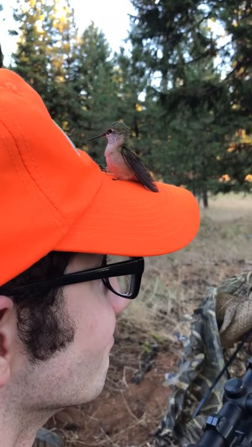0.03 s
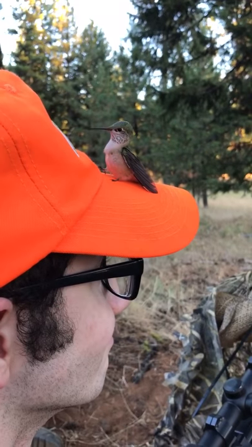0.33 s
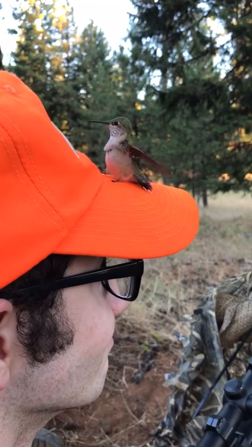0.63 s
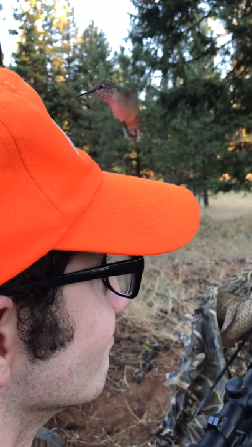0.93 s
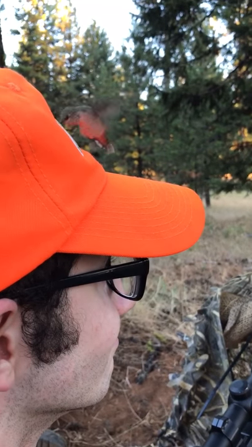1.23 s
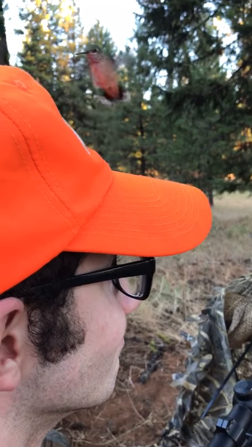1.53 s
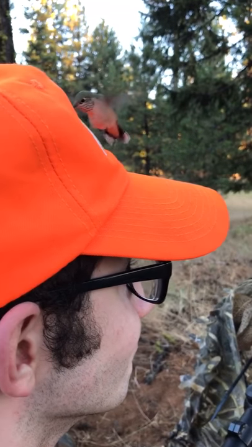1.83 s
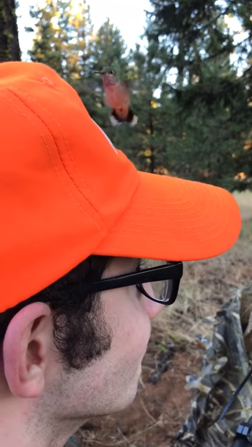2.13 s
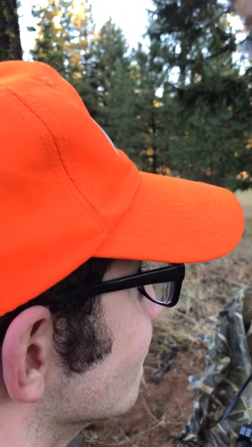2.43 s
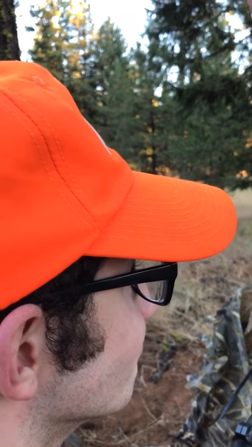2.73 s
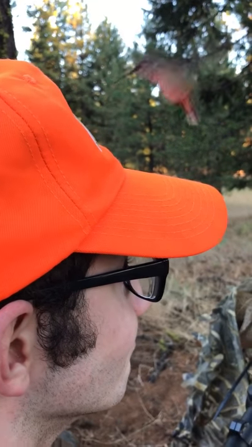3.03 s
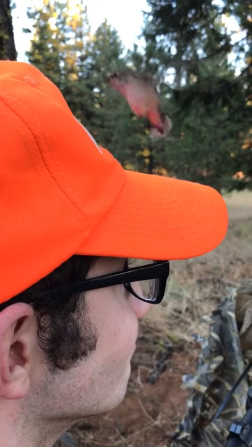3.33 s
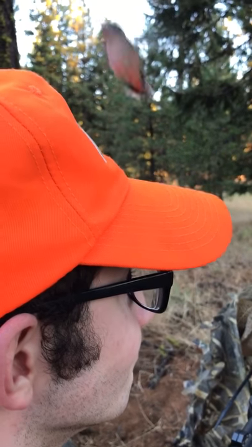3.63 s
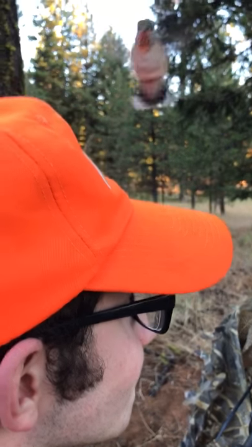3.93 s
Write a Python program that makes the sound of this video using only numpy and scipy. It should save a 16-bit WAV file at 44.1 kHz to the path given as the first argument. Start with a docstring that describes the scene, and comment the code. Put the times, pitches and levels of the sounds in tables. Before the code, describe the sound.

A hummingbird's wings hum softly as it takes off and hovers, over faint wind.

```python
"""Faint wind fills a still clearing, and a far insect starts to whistle on and off.
Just before one second, a hummingbird lifts off the brim of a cap. Each wingbeat pushes two soft
pulses of air and brushes the feathers twice. One small knock sounds just after take-off.
The bird then hovers around the cap: sharp turns add a swish, and the hum swells as it comes near,
most of all just after a tiny tick at 2.4 seconds."""
import sys
import numpy as np
from scipy import signal
from scipy.fft import rfft, irfft
from scipy.io import wavfile

SR = 44100
rng = np.random.default_rng(int(sys.argv[2]) if len(sys.argv) > 2 else 0)


def int16_out(signal):
    """Quantize to a 16-bit WAV file."""
    q = np.round(np.clip(np.atleast_2d(signal).T, -1, 1) * 32767)
    wavfile.write(sys.argv[1], SR, q.astype(np.int16))


N = 176400
TIME = np.arange(N) / SR

# How strong the wings' push on the air sounds: time_s, level_db
THRUST = [(.83,-73),(.89,-52.5),(.98,-62.5),(1.05,-72),(1.11,-57.5),(1.17,-61),(1.24,-64),(1.33,-62),(1.42,-66),(1.52,-53.5),(1.57,-72),(1.64,-54),(1.70,-66.5),(1.80,-56.5),(1.9,-58.5),(2.05,-57),(2.2,-64.5),(2.28,-62.5),(2.38,-72),(2.42,-59.5),(2.465,-42.5),(2.63,-49),(2.768,-43.5),(2.81,-53),(2.88,-56),(2.97,-53),(3.13,-55.5),(3.21,-64.5),(3.35,-55.5),(3.43,-51.5),(3.49,-65),(3.59,-67.5),(3.70,-52.5),(3.79,-66),(3.87,-51),(3.93,-64),(3.98,-50.5)]
STRONG_THRUST_DB = -41  # strokes grow even as the thrust nears this level
TAKEOFF_S = .8455
DOWNSTROKE_AT, UPSTROKE_AT = .429, .079  # places in one wingbeat, from 0 to 1


def wing_strokes(push_s=.00043, suck_s=.00165, suck_delay_s=.0035, jitter_s=.0003, scatter_db=1):
    """Each stroke gives a short push of air, then a longer suck. Light ones are duller and less even."""
    # The upstroke's strength against the downstroke's as the bird turns: time_s, level_db
    upstroke = [(.88,4),(1.13,-21.5),(1.36,-0.5),(1.65,-3.5),(2.02,-11),(2.3,1),(2.44,-27),(2.78,-20.5),(2.9,-17),(3.12,-19),(3.25,-3),(3.4,-15),(3.67,-7),(3.8,-20),(4,-1)]
    t = np.arange(-1024, 1025) / SR
    pulse = np.exp(-.5 * (t / push_s) ** 2) - .92 * np.exp(-.5 * ((t - suck_delay_s) / suck_s) ** 2)
    down, up = beat_times(DOWNSTROKE_AT), beat_times(UPSTROKE_AT)
    times = np.r_[down, up]
    down_share = 1 / np.hypot(1, amp(curve(upstroke, down)))
    up_share = 1 / np.hypot(1, amp(-curve(upstroke, up)))
    lightness = np.clip((STRONG_THRUST_DB - curve(THRUST)) / 15.5, .1, 1)
    late, loud = rng.standard_normal((len(times), 2)).T * np.interp(times, TIME, lightness)
    gains = np.r_[down_share, up_share] * amp(scatter_db * loud)
    air = pulse_train(times + jitter_s * late, gains, pulse)
    air = unit(signal.sosfilt(butter(2, hz=20, kind="high"), air))
    crisp = signal.sosfiltfilt(butter(4, hz=410), air)
    dull = signal.sosfiltfilt(butter(4, hz=320), air)
    return (crisp + .57 * lightness * (dull - crisp)) * amp(curve(THRUST) + 1)


def hum():
    """Lift rises and falls twice a beat, just ahead of the push. The body bobs once, an octave lower."""
    # How the smooth hum swells and fades: time_s, relative_db
    swell = [(.83,-71),(.88,-44),(.92,-50.5),(.99,-84),(1.15,-51.5),(1.39,-81),(1.5,-62),(1.8,-67),(1.88,-81),(2.02,-50),(2.22,-81),(2.28,-44),(2.335,-43),(2.38,-64),(2.48,-40),(2.65,-47),(2.77,-40.5),(2.9,-50.5),(3.0,-43),(3.14,-51),(3.2,-70),(3.35,-46),(3.55,-60),(3.75,-51),(4,-68)]
    beats = beat_count() - DOWNSTROKE_AT
    lift = np.cos(2 * np.pi * 2 * (beats + .033)) * amp(curve(swell) - 8.5)
    bob_db = -58 + .45 * (curve(THRUST) - STRONG_THRUST_DB)
    bob = np.cos(2 * np.pi * (beats - .71)) * amp(bob_db)
    return np.sqrt(2) * (lift + bob)


def dash_overtones():
    """In a quick dash both strokes bite alike, so tones at 4, 6 and 8 times the beat rate ring out."""
    # Quick dashes: middle_s, half_length_s, level_db
    dashes = [(0.889,0.017,-58.5),(1.32,0.032,-66),(1.485,0.028,-64),(2.261,0.013,-58),(2.304,0.032,-59.5),(3.683,0.032,-65)]
    # Strength of the three tones, lowest first: relative_db
    tone_levels = [3, -21.5, -17]
    phase = 2 * np.pi * (beat_count() - DOWNSTROKE_AT)
    tones = sum(amp(db) * np.cos(multiple * phase) for multiple, db in zip((4, 6, 8), tone_levels))
    return np.sqrt(2) * bursts(dashes) * tones


def wake():
    """Swirls of air left by the wings flutter once a beat and partly follow the thrust."""
    # The low rumble of the swirls: pitch_hz, relative_db
    spectrum = [(25,-11),(50,2.5),(110,1),(190,-1.5),(340,-9),(480,-16),(750,-28),(2500,-31.5),(6000,-41.5)]
    flutter = 1 + .71 * np.cos(2 * np.pi * (beat_count() - .45))
    level_db = -63 + .3 * (curve(THRUST) + 56)
    return noise(spectrum) * flutter * amp(level_db)


def feather_brushes(rise_s=.0019, fall_s=.0014, weaker_db=-4, scatter_db=3):
    """The feathers brush at both ends of the stroke: a short high tick, then a weaker one."""
    # How loud the brushing is: time_s, relative_db
    loudness = [(0.83, -90), (0.85, -69), (0.89, -70.5), (0.98, -72.5), (1.18, -72), (1.43, -75.5),
                (1.51, -72), (1.54, -80.5), (1.85, -75), (2.29, -76.5), (2.37, -83), (2.49, -75),
                (2.6, -75.5), (3.15, -70.5), (3.69, -70.5), (3.77, -77.5)]
    # The bright hiss of the feathers: pitch_hz, relative_db
    spectrum = [(1000,-26),(2500,-6.5),(4800,-8),(7400,-5),(8600,0.5),(9900,0),(10450,-5),(11100,1),(16800,1.5)]
    t = np.arange(-512, 513) / SR
    shape = np.where(t < 0, np.exp(-(t / rise_s) ** 2), np.exp(-abs(t) / fall_s))
    brushing = .15  # a little hiss stays between the ticks
    for times, db in (beat_times(0), 0), (beat_times(.4), weaker_db):
        gains = amp(db + scatter_db * rng.standard_normal(len(times)))
        brushing = brushing + pulse_train(times, gains, shape)
    return noise(spectrum) * unit(brushing) * amp(curve(loudness) + 1.5)


def swishes(hover_db=-79):
    """Air tears off the wings in mid-stroke, most of all in sharp moves."""
    # Sharp moves: middle_s, half_length_s, level_db
    moves = [(0.877,0.031,-72.5),(1.492,0.034,-68),(1.877,0.021,-73),(2.096,0.02,-75),(2.27,0.015,-69.5),(2.494,0.02,-69),(3.346,0.034,-69.5),(3.675,0.034,-69.5)]
    # The rush of torn air: pitch_hz, relative_db
    spectrum = [(200,-5),(500,8),(750,-3.5),(1150,1.5),(1700,-4.5),(3000,-14),(5000,-20),(7000,-17),(16000,-24.5)]
    twice_a_beat = unit(np.exp(.88 * np.cos(2 * np.pi * 2 * (beat_count() - .15))))
    return noise(spectrum) * (amp(hover_db) + bursts(moves)) * twice_a_beat


def feather_flicks(half_length_s=.0017):
    """Feather tips snap through the air as the bird brakes."""
    # Single snaps: middle_s, level_db
    snaps = [(1.317,-69.5),(1.48,-65),(1.5,-70),(2.462,-58.5),(2.484,-60),(2.507,-66),(2.531,-61),(2.741,-68),(2.764,-65.5),(3.335,-59.5),(3.354,-78),(3.651,-68),(3.675,-64)]
    # The sharp noise of a snap: pitch_hz, relative_db
    spectrum = [(700,2),(1450,6),(2100,-5),(3000,-1.5),(4800,-11.5),(6500,-1.5),(9000,-10),(16000,-22)]
    return noise(spectrum) * bursts((middle_s, half_length_s, db) for middle_s, db in snaps)


def knock(start_s=1.0005, echo_s=.0084, echo_db=-12.5):
    """A small hollow knock with a soft thud and one quick echo."""
    # The tones that ring in the knock: pitch_hz, level_db, ring_s
    tones = [(140,-44.5,0.032),(325,-37.5,0.013),(556,-33,0.02),(970,-42.5,0.0091),(2130,-43,0.011),(3340,-38.5,0.0025),(4030,-48.5,0.0065)]
    return sum(ring(start_s, *tone) + amp(echo_db) * ring(start_s + echo_s, *tone) for tone in tones)


def tick():
    """One tiny high tone that dies away at once."""
    return ring(start_s=2.408, pitch_hz=4120, level_db=-59.5, ring_s=.022)


def breeze(level_db=-67.5):
    """Faint, steady wind and hiss."""
    # The wind's rumble and hiss: pitch_hz, relative_db
    spectrum = [(15,-8),(42,1.5),(75,-0.5),(130,-9),(340,-9.5),(480,-16.5),(1000,-18),(1900,-24.5),(4000,-26),(4900,-28.5),(6500,-26.5),(7700,-30.5),(9500,-28.5),(10450,-32.5),(11500,-29.5),(13500,-28.5),(17000,-34)]
    return noise(spectrum) * amp(level_db)


def insect(pitch_hz=11130, level_db=-89.5, fade_s=.06):
    """A thin, broken whistle far off, probably an insect, comes and goes."""
    # When the insect calls: start_s, end_s
    calls = [(.33,0.73),(.69,1.3),(1.6,2.3),(2.5,3.2)]
    calling = sum(np.clip(np.minimum(TIME - start, end - TIME) / fade_s, 0, 1) for start, end in calls)
    waver = unit(signal.sosfilt(butter(2, hz=170), rng.standard_normal(N)))
    throb = unit(signal.sosfilt(butter(2, hz=12), rng.standard_normal(N)))
    whistle = np.sin(2 * np.pi * pitch_hz * TIME) * waver * (1 + .5 * throb)
    return unit(whistle) * calling * amp(level_db)


def beat_count():
    """How many wingbeats have passed since take-off, at every sample."""
    # How fast the wings beat: time_s, beats_per_s
    beat_rate = [(0.84, 49.06), (1.0, 42.29), (1.16, 45.82), (1.28, 44.35), (1.32, 49.06), (1.4, 40.59),
                 (1.48, 52.52), (1.56, 36.28), (1.76, 45.13), (1.8, 44.19), (1.88, 48.21), (1.92, 42.88),
                 (2.12, 45.89), (2.16, 38.25), (2.21, 38), (2.255, 54), (2.32, 45), (2.38, 35.6),
                 (2.48, 46.36), (2.52, 42.17), (2.76, 43.88), (2.8, 41.52), (3.44, 44.87), (3.48, 39.04),
                 (3.64, 46.48), (3.68, 50.49), (3.76, 37.05), (4.0, 44.08)]
    beats = np.cumsum(curve(beat_rate)) / SR
    return beats - np.interp(TAKEOFF_S, TIME, beats)


def beat_times(place):
    """The times at which the wings pass one place (0 to 1) in their beat."""
    beats = beat_count()
    return np.interp(np.arange(int(beats[-1]) + 1) + place, beats, TIME, right=TIME[-1] + 1)


def pulse_train(times, gains, shape):
    """Centres one copy of a shape on each time, even between two samples."""
    clicks = np.zeros(N + 1)
    inside = times < TIME[-1]
    sample, fraction = np.divmod(times[inside] * SR, 1)
    clicks[sample.astype(int)] += gains[inside] * (1 - fraction)
    clicks[sample.astype(int) + 1] += gains[inside] * fraction
    return signal.fftconvolve(clicks[:N], shape, "same")


def bursts(rows):
    """One smooth rise and fall for each row of middle_s, half_length_s, level_db."""
    return sum(amp(db) * np.exp(-((TIME - middle) / half) ** 2) for middle, half, db in rows)


def ring(start_s, pitch_hz, level_db, ring_s, rise_cycles=.7):
    """One tone of a struck object: it swells quickly and fades by 60 dB in ring_s."""
    t = np.maximum(TIME - start_s, 0)
    rise = 1 - np.exp(-t * pitch_hz / rise_cycles)
    fade = np.exp(-np.log(1000) * t / ring_s)
    return amp(level_db) * rise * fade * np.sin(2 * np.pi * pitch_hz * t)


def noise(spectrum):
    """Noise of strength 1, shaped by rows of pitch_hz, relative_db."""
    hz, db = np.transpose(spectrum)
    shape = amp(np.interp(np.log(np.fft.rfftfreq(N, 1 / SR) + 1), np.log(hz), db))
    return unit(irfft(rfft(rng.standard_normal(N)) * shape, N))


def butter(order, hz, kind="low"):
    """A filter that keeps what lies below ("low") or above ("high") a pitch."""
    return signal.butter(order, hz, kind, fs=SR, output="sos")


def curve(points, t=TIME):
    """Joins rows of time and value with straight lines."""
    return np.interp(t, *np.transpose(points))


def amp(db):
    """Turns decibels into a gain."""
    return 10 ** (np.asarray(db) / 20)


def unit(x):
    """Scales a signal to an average strength (rms) of 1."""
    return x / np.sqrt(np.mean(x ** 2) + 1e-20)


def scene(fade_in_s=.02):
    """The flying bird, a knock and a tick over the breeze and a far insect, in one channel."""
    flying = np.clip((TIME - TAKEOFF_S) / fade_in_s + 1, 0, 1)
    bird = wing_strokes() + hum() + dash_overtones() + wake()
    bird += feather_brushes() + swishes() + feather_flicks()
    return (flying * bird + knock() + tick() + breeze() + insect())[None]


def record(dry, bass_cut_hz=33, treble_cut_hz=17200):
    """Takes away the deepest bass and the highest treble."""
    dry = signal.sosfiltfilt(butter(6, bass_cut_hz, "high"), dry, padtype="even", padlen=8000)
    treble_cut = signal.firwin(511, treble_cut_hz, window=("kaiser", 9), fs=SR)
    return signal.oaconvolve(dry, treble_cut[None], "same")


dry = scene()
out = record(dry)
int16_out(out)
```